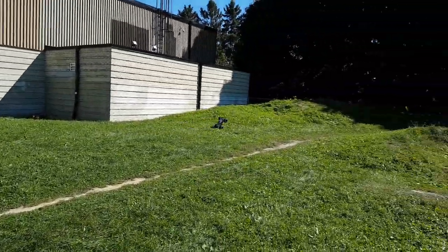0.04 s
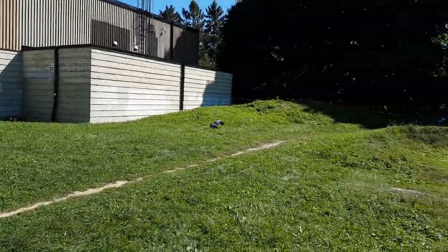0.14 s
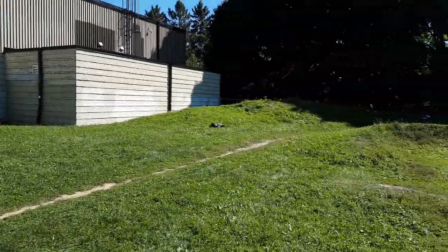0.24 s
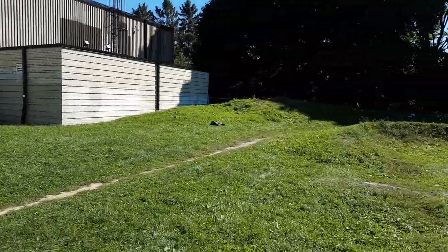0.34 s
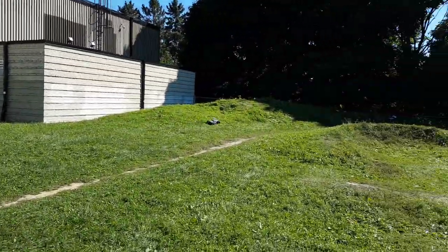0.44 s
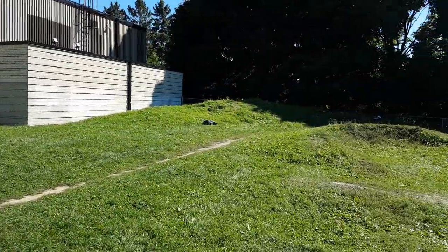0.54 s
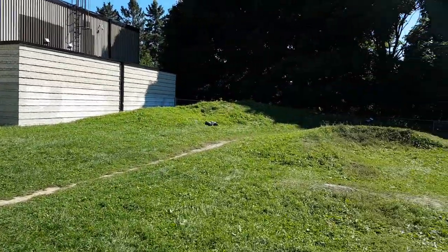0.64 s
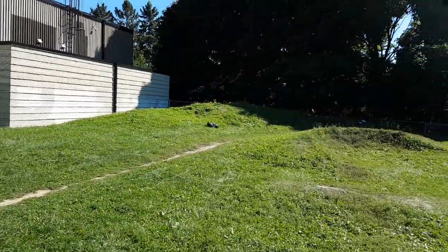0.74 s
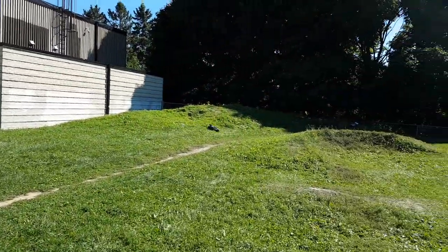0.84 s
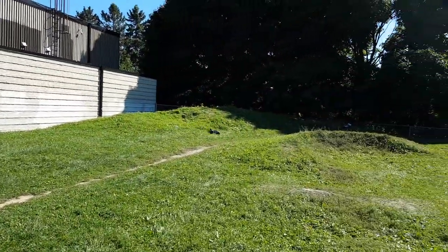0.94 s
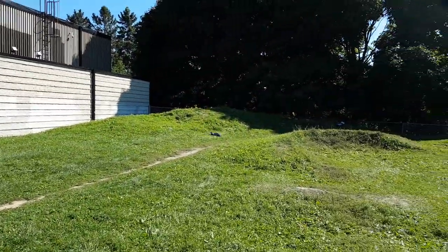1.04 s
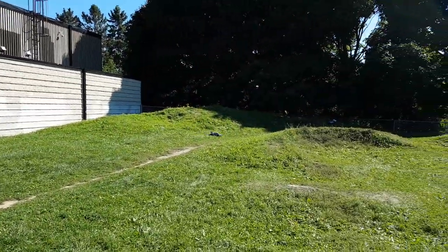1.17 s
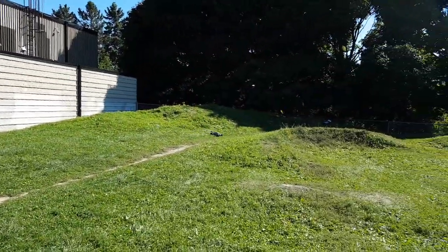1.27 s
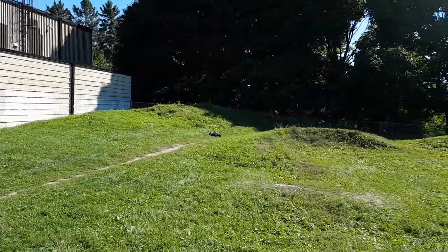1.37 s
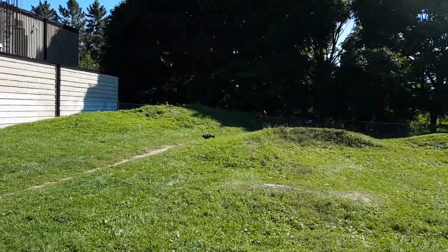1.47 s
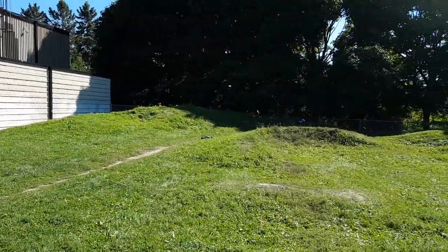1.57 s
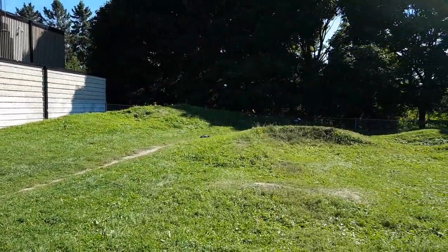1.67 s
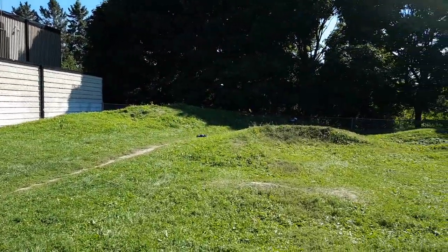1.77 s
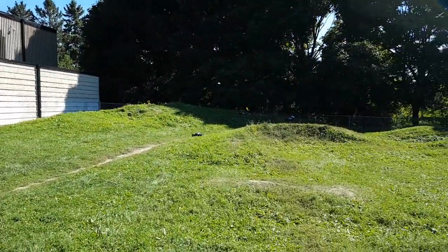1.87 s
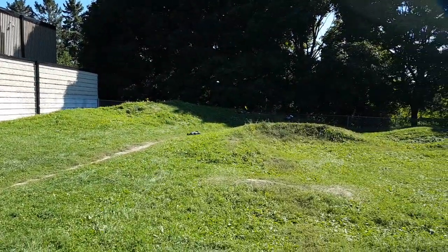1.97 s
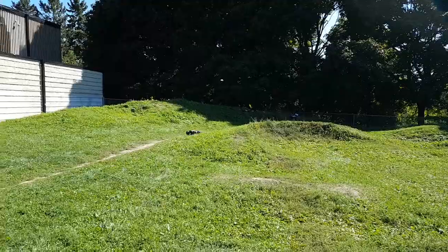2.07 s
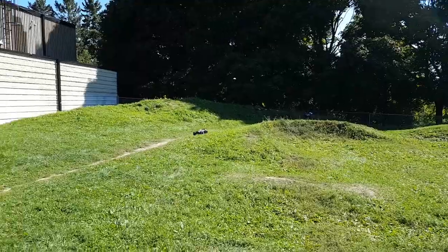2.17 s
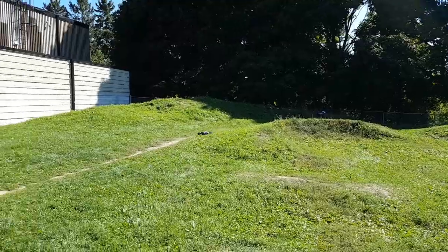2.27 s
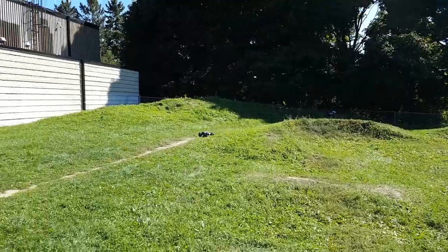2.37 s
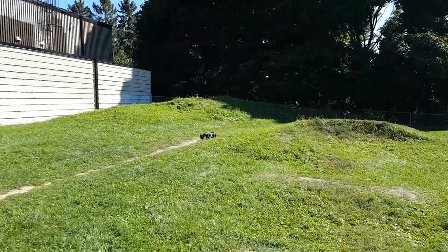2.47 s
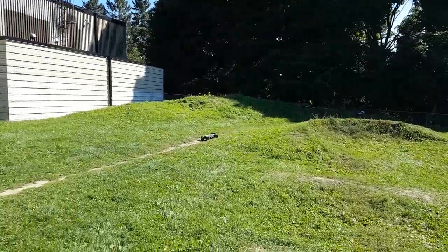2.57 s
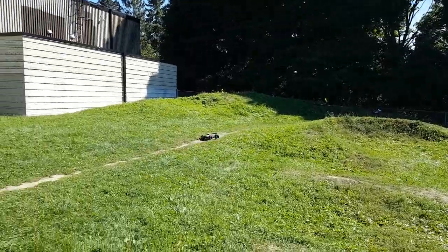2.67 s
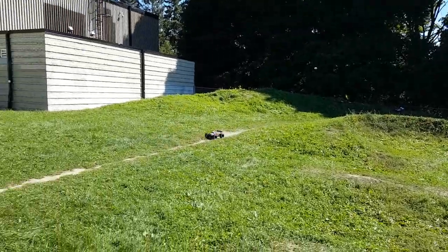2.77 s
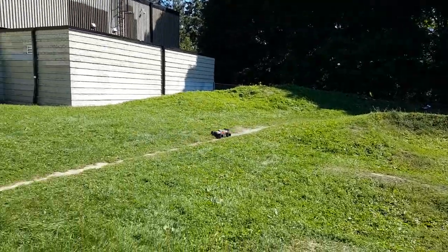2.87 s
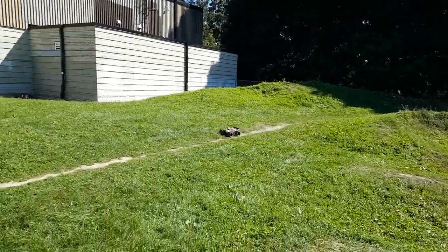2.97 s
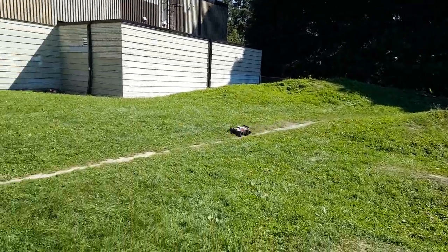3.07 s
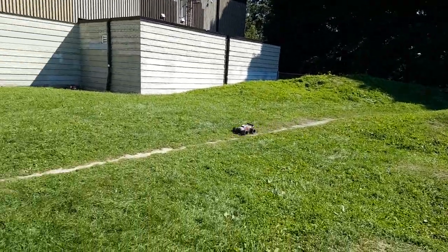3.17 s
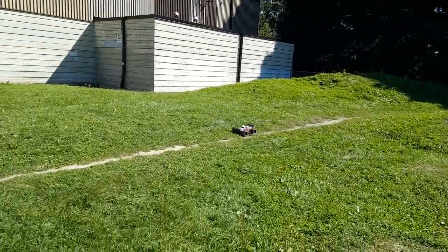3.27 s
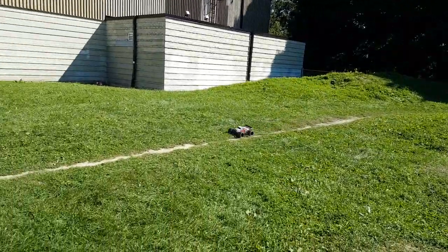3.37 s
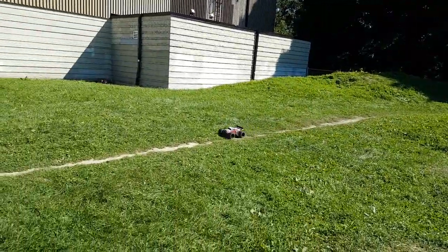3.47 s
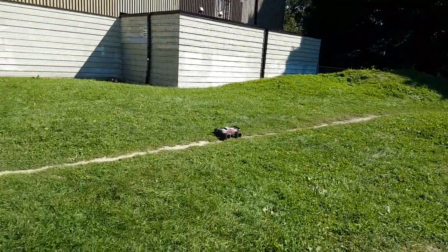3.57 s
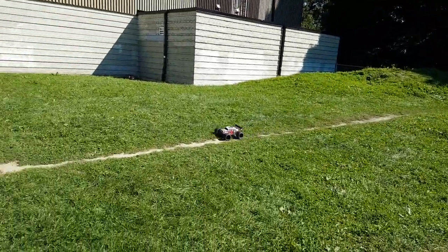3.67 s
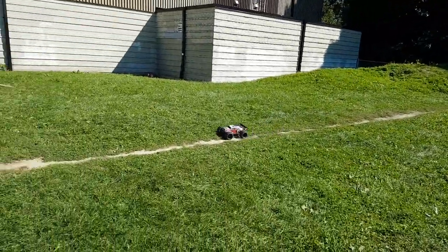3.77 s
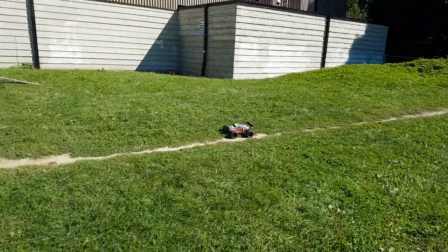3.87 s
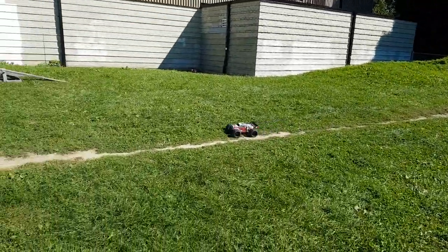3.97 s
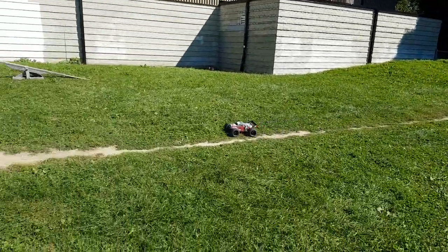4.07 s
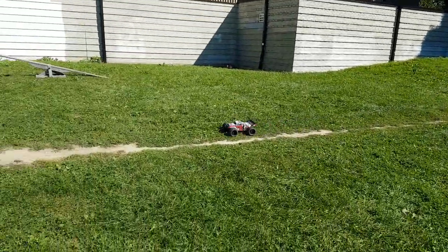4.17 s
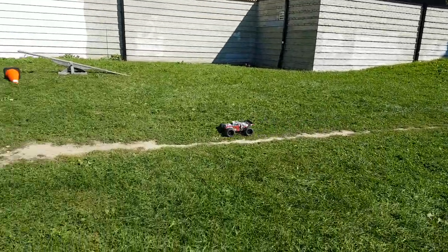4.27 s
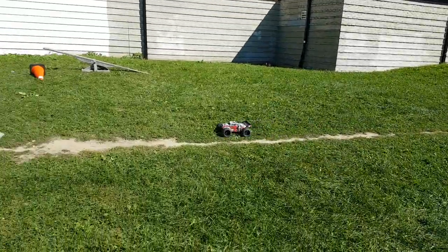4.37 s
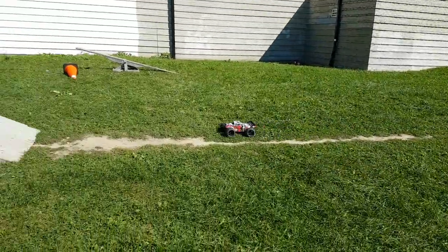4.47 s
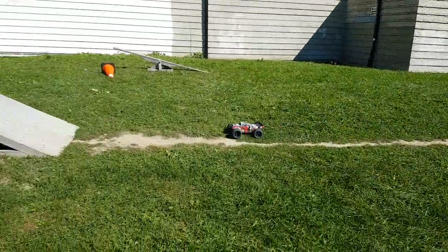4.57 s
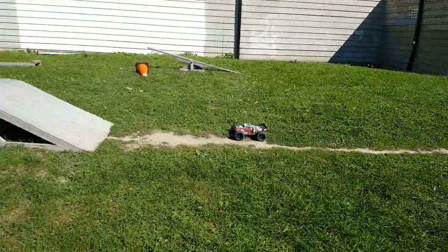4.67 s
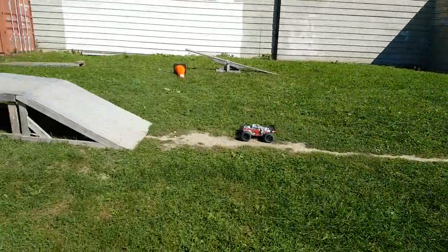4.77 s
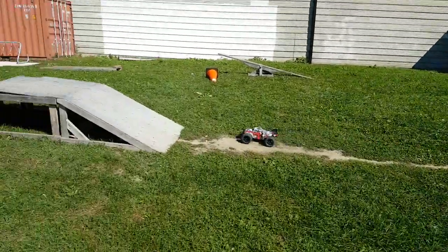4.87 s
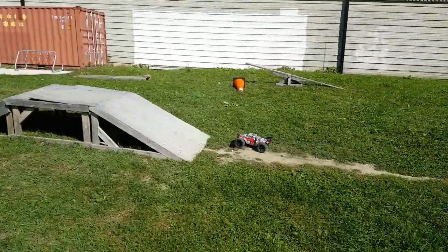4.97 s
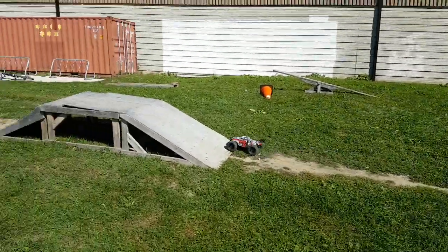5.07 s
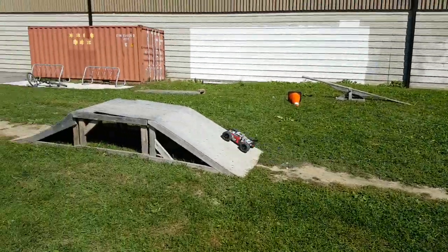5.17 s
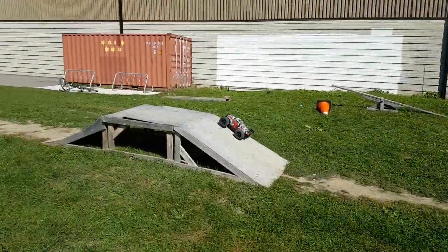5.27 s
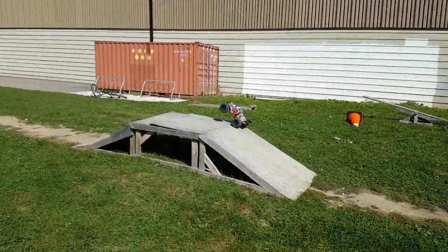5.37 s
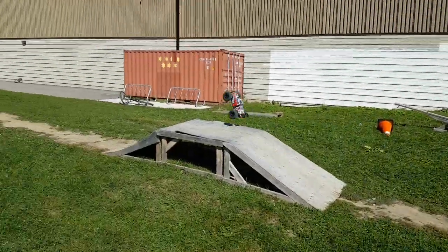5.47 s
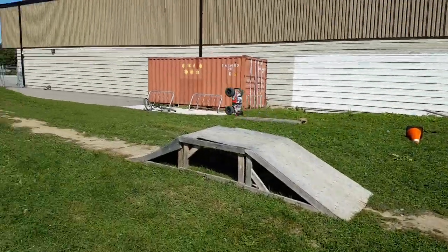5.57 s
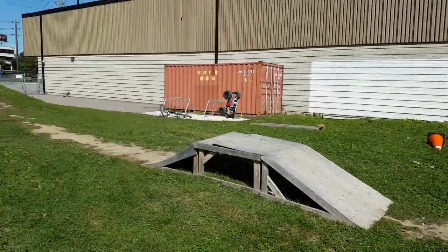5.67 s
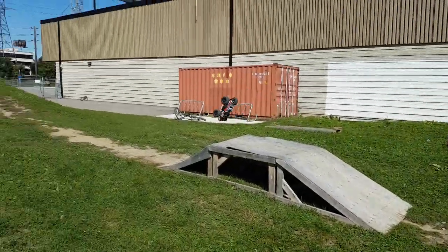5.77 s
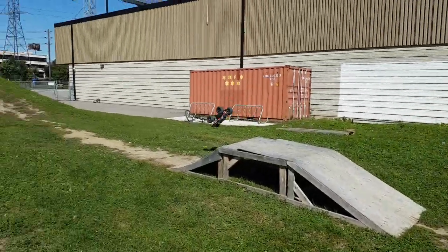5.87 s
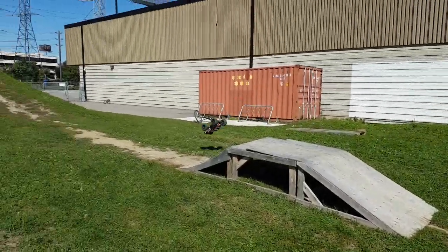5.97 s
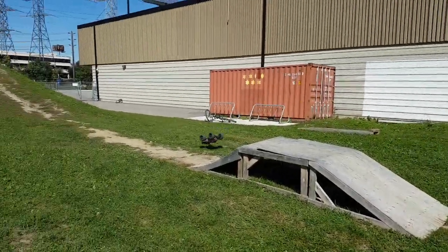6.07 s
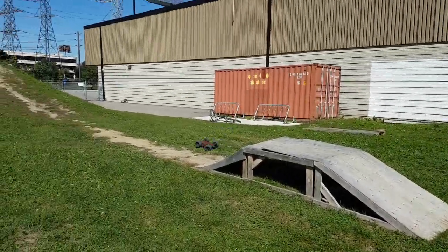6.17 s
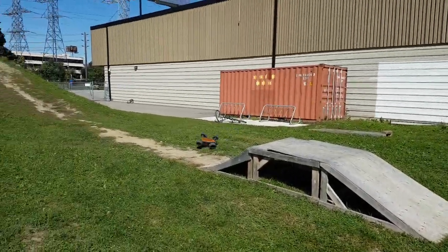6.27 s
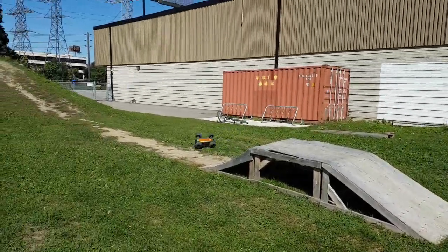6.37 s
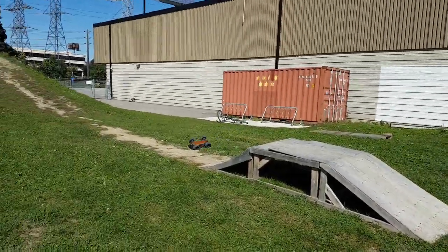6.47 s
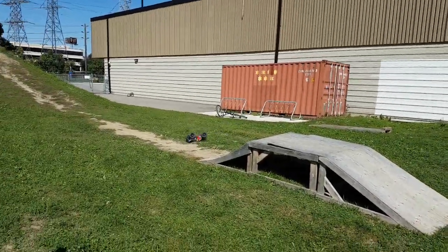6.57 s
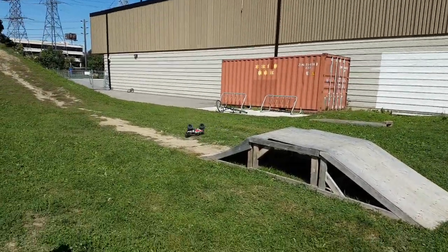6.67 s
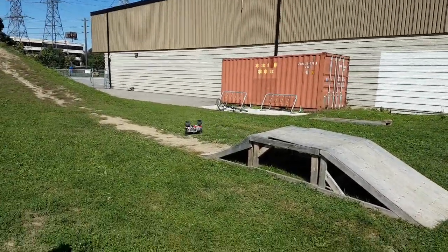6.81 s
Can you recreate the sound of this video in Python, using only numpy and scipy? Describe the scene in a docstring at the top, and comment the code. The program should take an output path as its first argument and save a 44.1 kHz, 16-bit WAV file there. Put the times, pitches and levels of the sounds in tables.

```python
"""Model truck jumping a ramp

Far out on a lawn a battery model truck blips its motor, races up close, bangs over a wooden ramp and
lands. Its gear teeth whine and rattle, its tyres patter through grass, its plastic body clatters, and
a wall echoes faintly. Underneath lie distant traffic, a hum, a few faint chirps and a light breeze.
The camera that holds the two microphones ticks once, and its left channel pops once."""
import sys
import numpy as np
from scipy import signal
from scipy.fft import rfft, irfft
from scipy.io import wavfile
from scipy.ndimage import map_coordinates

SR = 44100
rng = np.random.default_rng(int(sys.argv[2]) if len(sys.argv) > 2 else 0)


def persist_wave(psi):
    """Save psi, clipped to +-1, as 16-bit WAV."""
    counts = np.round(np.clip(psi, -1, 1) * 32767).astype(np.int16)
    wavfile.write(sys.argv[1], SR, np.atleast_2d(counts).T)


N = 301644
TIME = np.arange(N) / SR
FREQS = np.maximum(np.fft.rfftfreq(N, 1 / SR), 1)
TOP_HZ = 15800  # the highest pitch kept

# the bright tone of the truck's thin plastic shell: (frequency [Hz], level [dB])
SHELL_TONE = [(1500, -13), (2900, 5.5), (3600, 3), (4500, 1.5), (5300, -0.5), (6000, -6.5), (7300, -9.5),
              (8400, -21), (9600, -20.5), (12000, -14.5), (15500, -24)]
# pitches that the gear housing boosts or swallows: (frequency [Hz], width [Hz], boost [dB])
HOUSING_RESONANCES = [(1385, 64, 3.5), (1476, 60, -7.5), (1679, 150, 12.5), (2363, 270, 6.5), (2556, 54, 4),
                      (2810, 210, -3), (3450, 150, 6.5), (4600, 150, 0.5), (6100, 113, 9.5),
                      (6440, 120, 4.5)]


def undb(db):
    """Turn decibels into a factor to multiply by."""
    return np.exp(np.asarray(db) * (np.log(10) / 20))


def unit(x):
    """Scale a signal to an average (rms) size of 1."""
    return x / np.sqrt(np.mean(x ** 2))


def over_time(table):
    """Join rows of (time, values...) into one curve for each value column."""
    times, *columns = np.transpose(table)
    return [np.interp(TIME, times, column) for column in columns]


def over_hz(points):
    """Join (frequency, value) points into a curve, giving every octave equal room."""
    hz, value = np.transpose(points)
    return np.interp(np.log(FREQS), np.log(hz), value)


def boosts(resonances):
    """The decibels that a set of resonances adds at each frequency."""
    return sum(db / (1 + (2 * (FREQS - hz) / width) ** 2) for hz, width, db in resonances)


def colour(x, db):
    """Filter x by the given decibels at each frequency."""
    cepstrum = irfft(np.log(undb(db)), N)
    cepstrum[1:N // 2] *= 2  # folded so that ringing comes after a hit, not before
    cepstrum[N // 2 + 1:] = 0
    return irfft(rfft(x) * np.exp(rfft(cepstrum)), N)


def wobble(rate):
    """A smooth random curve of size 1 that changes about rate times a second."""
    knots = rng.standard_normal(8192)
    coarse_times = np.linspace(0, N / SR, N // 16)
    smooth = map_coordinates(knots, [2 * rate * coarse_times], order=3, mode="wrap")
    return unit(np.interp(TIME, coarse_times, smooth))


def noise(tone_db):
    """Two unrelated streams of smooth noise with the given tone."""
    return unit(colour(rng.standard_normal((2, N)), tone_db))


def impacts(rate, spread_db):
    """Two unrelated streams of tiny hits of uneven size, about rate a second in each."""
    out = np.zeros((2, N))
    hits = rng.random(out.shape) < rate / SR
    sizes = rng.exponential(size=out.shape)[hits]
    pushes = rng.standard_normal(out.shape)[hits]
    out[hits] = pushes * undb(spread_db * np.minimum(sizes, 4))
    return unit(out)


def patter(tone_db, rate, spread_db):
    """Many tiny hits on something with the given tone."""
    return unit(colour(impacts(rate, spread_db), tone_db))


def envelope(start, length, attack, t60):
    """Rise, hold until length is up, then fade; t60 is the seconds it takes to fall by 60 dB."""
    rise = np.clip((TIME - start) / attack, 0, 1)
    return rise * np.exp(-np.log(1000) * np.clip((TIME - start - length) / t60, 0, 3))


def ring(start, db, hz, t60):
    """A struck object rings at one pitch and dies away."""
    out = np.zeros(N)
    span = slice(int(start * SR) + 1, int((start + 2 * t60) * SR))
    age = TIME[span] - start
    out[span] = undb(db) * np.sin(2 * np.pi * hz * age) * np.exp(-np.log(1000) * age / t60)
    return out


def microphones(pair, diffuse):
    """Mix two unrelated signals into left and right; a larger diffuse makes the sides less alike."""
    # how alike the two sides are: (frequency [Hz], likeness [0 to 1])
    likeness = [(100, 1), (300, 0.99), (700, 0.98), (1400, 0.82), (3000, 0.69), (7000, 0.2), (15000, 0.16)]
    # the camera body shades one side: (frequency [Hz], left minus right [dB])
    shading = [(100, 0), (700, -.7), (1300, -2), (2400, -6), (3600, -2.5), (4500, -3.5), (5300, 3),
               (6300, 6), (7300, 0), (15000, 1)]
    # sound bends round the camera and reaches the right side late: (frequency [Hz], delay [ms])
    right_lag = [(150, 0.048), (600, 0.044), (1700, 0.051), (3200, .12), (4500, 0.18), (6000, 0.311),
                 (15000, 0.303)]
    alike = np.clip(over_hz(likeness), 0, 1) ** diffuse
    mid, side = rfft(pair) * np.sqrt([1 + alike, 1 - alike]) / np.sqrt(2)
    shade = undb(over_hz(shading) / 2)
    delay = np.exp(-2j * np.pi * FREQS * over_hz(right_lag) / 1000)
    return irfft([(mid + side) * shade, (mid - side) / shade * delay], N)


def yard_echo(x, t60=0.77, tail_db=-11, wall_s=.075, wall_db=-15):
    """The wall throws back one echo; trees and buildings scatter a short tail."""
    fade = np.exp(-np.log(1000) * np.minimum(TIME / t60, 4))
    tail = rng.standard_normal((2, N)) * fade * np.minimum(TIME / 0.0065, 1)
    tail *= undb(tail_db) / np.sqrt(np.sum(tail ** 2) / 2)
    wall = undb(wall_db) * np.exp(-2j * np.pi * FREQS * wall_s)
    return irfft(rfft(x) * (rfft(tail) + wall * np.array([[1], [0]])), N)


def nearness():
    """One over the truck's distance: twice as far away, its sound is half as strong."""
    # the truck's path: (time [s], distance from the microphones [m])
    path = [(0, 16.5), (1.3, 17.1), (2.4, 14.2), (3.6, 9.7), (4.4, 8.2), (5.1, 3.04), (6.2, 7.1),
            (6.84, 17)]
    return 1 / np.maximum(over_time(path)[0], 1)


def town(traffic_db=-55, hum_hz=308, hum_db=-55):
    """Distant traffic murmurs from all sides, with a wavering machine hum."""
    # the tone of far-off traffic: (frequency [Hz], level [dB])
    traffic_tone = [(25, -25), (45, -10), (120, -8), (200, -32), (320, -3), (460, -14), (700, -9),
                    (1400, -14.5), (2400, -16), (3100, -22), (4600, -29.5), (6300, -34.5), (8400, -43),
                    (15500, -35.5)]
    traffic = noise(over_hz(traffic_tone)) * undb(traffic_db + 1.8 * wobble(2.273))
    hum = np.sin(2 * np.pi * hum_hz * TIME + 0.69 * wobble(10)) * undb(hum_db + 2 * wobble(6))
    return microphones(traffic, diffuse=57.0) + hum


def chirps(waver=.04, direct_db=-8, scatter_db=4):
    """Short, unsteady chirps, perhaps from a bird, are blurred by the trees."""
    # faint high calls: (time [s], level [dB], length [s], start pitch [Hz], end pitch [Hz])
    calls = [(2.942, -51.5, 0.055, 5220, 5650), (3.106, -52, 0.033, 6050, 5980),
             (3.679, -42.5, 0.032, 4550, 4910), (3.71, -48, .03, 5200, 4850),
             (3.823, -54, 0.042, 5850, 5600)]
    out = np.zeros(N)
    for start, db, length, start_hz, end_hz in calls:
        progress = np.clip((TIME - start) / length, 0, 1)
        hz = (start_hz + (end_hz - start_hz) * progress) * (1 + waver * wobble(190))
        out += undb(db) * np.sin(np.pi * progress) * np.sin(2 * np.pi * np.cumsum(hz) / SR)
    return undb(direct_db) * out + undb(scatter_db) * yard_echo(out, t60=0.27, wall_db=-28)


def breeze(start_s=5.3, length_s=1.37, rumble_db=-51, corner_hz=130):
    """A light breeze makes a low rumble on the microphones."""
    tone_db = -10 * np.log10((1 + (FREQS / corner_hz) ** 8) * (1 + (corner_hz / 2 / FREQS) ** 2))
    rumble = noise(np.maximum(tone_db, -80))
    return rumble * undb(rumble_db) * envelope(start_s, length_s, attack=0.13, t60=.6)


def camera(tick_s=.5622, pop_s=1.83287, step_db=1.0, drain_hz=98):
    """The camera's case ticks; a jump in voltage pops in the left channel and drains away."""
    # the ringing of the case: (pitch [Hz], level [dB], fade time [s])
    case_rings = [(1760, -17, .012), (2150, -23, .007), (2900, -29, .005)]
    tick = sum(ring(tick_s, db, hz, t60) for hz, db, t60 in case_rings)
    tick = signal.sosfilt(signal.butter(4, [1580, 3200], "band", fs=SR, output="sos"), tick)
    step = undb(step_db) * np.clip((TIME - pop_s) / .00006 + .5, 0, 1)
    pop = signal.sosfilt(signal.butter(2, drain_hz, "high", fs=SR, output="sos"), step)
    pop = colour(pop, boosts([(9000, 3500, -7)]))  # a wide dip softens the treble
    return np.array([tick / 2 + pop, tick])


def controller_sizzle(switch_hz=12000, flutter_rate=230):
    """At part throttle the speed controller chops the current, and the motor's coils sing thinly."""
    # moments of sizzle: (time [s], length [s], level [dB])
    sizzles = [(1.5, .04, -68), (1.88, 0.092, -72), (2.12, 0.034, -63), (2.331, .05, -58), (2.42, .22, -77)]
    gain = sum(undb(db) * envelope(start, length, attack=.02, t60=.1) for start, length, db in sizzles)
    tone = np.sin(2 * np.pi * switch_hz * TIME)
    return gain * tone * np.array([wobble(flutter_rate), wobble(flutter_rate)])


def grit(crack_t60=0.0081):
    """Stones and crumbs of earth hit the shell with a crack and make it ring briefly."""
    # each hit: (time [s], level [dB], pitch [Hz], fade time [s], crack compared with ring [dB])
    stones = [(.218, -27.5, 1200, 0.0066, -16), (.236, -37, 1350, 0.0072, -13),
              (1.183, -42, 2650, .015, -13), (1.477, -37, 4360, .012, -13), (1.643, -33, 740, 0.026, -31),
              (1.675, -31, 790, 0.013, -22), (1.87, -42, 3700, 0.013, -1), (1.884, -40, 4650, .014, 0),
              (1.903, -34, 3670, 0.013, -4), (1.982, -28.5, 3535, 0.018, -16),
              (1.992, -35, 905, 0.012, -15), (2.104, -35, 3570, 0.018, -9),
              (2.193, -24.5, 3600, 0.016, -12), (2.292, -40, 3530, .019, -11),
              (3.962, -39, 1705, 0.064, -14)]
    rings = sum(ring(start, db, hz, t60) for start, db, hz, t60, _ in stones)
    cracks = sum(undb(db + crack_db) * envelope(start, 0, 1 / SR, crack_t60)
                 for start, db, _, _, crack_db in stones)
    return rings + cracks * noise(over_hz(SHELL_TONE))


def tyres(soil_db=-34.5, tread_db=-30.5, bump_db=1.5, takeoff_s=5.48, landing_s=6.21, flight_db=-4):
    """Wheels thud on the soil and their knobs patter on the grass, louder on rough patches."""
    # the dull thud of soil: (frequency [Hz], level [dB])
    soil_tone = [(25, -21), (55, -5.5), (110, 1), (200, 1.5), (250, -3), (350, -17.5), (800, -51)]
    # tyre knobs on grass: (frequency [Hz], level [dB])
    grass_tone = [(100, -21.5), (220, -2), (280, 0), (390, 2.5), (500, -5), (720, 1), (1100, -7.5),
                  (1600, -23.5), (4000, -44.5)]
    # rough patches of lawn: (time [s], length [s], thud [dB], patter [dB])
    patches = [(-.05, 0.12, -44.5, -50.5), (0.262, 0.15, -45.5, -50.5), (1.447, 0.26, -50, -52),
               (1.877, 0.53, -50.5, -57.5), (2.361, 0.59, -69, -48), (3.724, 0.32, -44, -52),
               (4.303, 0.612, -44.5, -69), (4.928, 0.25, -42.5, -41), (6.556, 0.21, -48.5, -58)]
    in_air = (TIME > takeoff_s) & (TIME < landing_s)
    rolling = nearness() * undb(flight_db * in_air)
    power = np.outer(undb([soil_db, tread_db]), rolling) ** 2
    for start, length, *levels_db in patches:
        power += np.outer(undb(levels_db), envelope(start, length, attack=0.023, t60=0.77)) ** 2
    soil_gain, tread_gain = np.sqrt(power)
    soil = patter(over_hz(soil_tone), rate=3000, spread_db=0.57) * soil_gain
    grass = patter(over_hz(grass_tone), rate=3000, spread_db=1.1) * tread_gain
    return (soil + grass) * undb(bump_db * wobble(24))


def ramp():
    """The tyres drum on the hollow wooden ramp while they cross it."""
    # how loud the drumming is: (time [s], level [dB])
    crossing = [(5.15, -43), (5.17, -20), (5.21, -25), (5.25, -33), (5.29, -26.5), (5.37, -27.5),
                (5.445, -23.5), (5.465, -32), (5.495, -44)]
    # the tone of the boards: (frequency [Hz], level [dB])
    board_tone = [(25, -39), (60, -37), (120, -12), (280, -6.5), (450, -6.5), (700, -2), (1030, -8.5),
                  (1400, -14), (2600, -21), (4000, -53), (9000, -68)]
    # pitches that the ramp boosts or swallows: (frequency [Hz], width [Hz], boost [dB])
    board_resonances = [(105.5, 24, 7.6), (239.2, 30, 8), (325.6, 32.6, 8), (680, 70, 4), (810, 20.8, -5),
                        (997, 63, 7.5)]
    drumming = patter(over_hz(board_tone) + boosts(board_resonances), rate=3000, spread_db=0.33)
    on_ramp = (TIME > crossing[0][0]) & (TIME < crossing[-1][0])
    return drumming * undb(over_time(crossing)[0]) * on_ramp


def body_knocks(contact_size=4.6, samples=16384):
    """Each knock is one hard contact amid loose parts clattering against the ringing shell."""
    # knocks: (time [s], level [dB], rise time [s], fade time [s], treble tilt [dB per octave])
    knocks = [(.069, -39, .006, 0.15, -7), (0.329, -35, 0.0033, 0.1, -2.5), (.39, -37, 0.0051, 0.086, -4),
              (1.641, -42, 0.0019, 0.066, -0.5), (1.671, -43, 0.0016, .08, -3),
              (1.69, -40, 0.0055, 0.048, -7), (2.083, -37, 0.0034, 0.057, -9.5),
              (2.632, -35, 0.021, 0.15, 1), (2.77, -44, 0.0091, 0.34, -9), (3.96, -41, .003, 0.11, 4),
              (3.995, -40.5, 0.0048, .076, 4), (5.162, -19, .003, 0.091, 0),
              (5.212, -21.5, 0.0065, 0.082, -5.5), (5.224, -17, 0.0029, 0.094, -1.5),
              (5.237, -17.5, 0.0029, 0.061, -5.5), (5.25, -13.5, 0.004, 0.09, -26),
              (6.207, -19, .009, 0.084, 3), (6.2194, -17, 0.004, 0.097, 0.5), (6.249, -27, .004, 0.086, -2),
              (6.261, -20.5, 0.0022, 0.036, 1.5), (6.273, -31, .004, .13, 3),
              (6.305, -32, 0.009, 0.1, -1.5), (6.557, -25, 0.015, 0.13, -1),
              (6.689, -36.5, 0.0099, 0.054, -9.5)]
    # the tone of the plastic body: (frequency [Hz], level [dB])
    body_tone = [(25, -48), (50, -25), (105, -0.5), (180, -0.5), (260, 7), (450, -5), (760, 1.5),
                 (1150, -11), (1400, -13), (2400, -11.5), (3150, -25.5), (3750, -17), (7200, -33),
                 (9000, -52), (12100, -43), (15500, -57)]
    # pitches that the struck shell boosts or swallows: (frequency [Hz], width [Hz], boost [dB])
    shell_resonances = [(251.1, 60, -6), (573, 29.5, 6.5), (760, 91, 0.5), (1000, 180, 5), (1349, 43, 12),
                        (1695, 170, 12.5), (1990, 60, -0.5), (2447, 80, 7), (2640, 230, 5.5),
                        (3593, 126, 9.5), (4067, 55, -4)]
    ticks = impacts(rate=4000, spread_db=1.65)
    contacts = [int((start + rise) * SR) for start, _, rise, _, _ in knocks]
    ticks[0, contacts] += contact_size
    clatter = colour(ticks, over_hz(body_tone) + boosts(shell_resonances))
    octaves = np.log2(np.clip(np.fft.rfftfreq(samples, 1 / SR), 220, 6000) / 700)
    out = np.zeros((2, N))
    for start, db, rise, t60, tilt_db in knocks:
        span = slice(int(start * SR), int(start * SR) + samples)
        age = np.maximum(TIME[span] - start, 0)
        shape = np.minimum(age / rise, 1) * np.exp(-np.log(1000) * np.maximum(age - rise, 0) / t60)
        tilted = irfft(rfft(clatter[:, span], samples) * undb(tilt_db * octaves))
        knock = tilted[:, :len(age)] * shape
        even_out = np.sqrt(np.sum(shape ** 2) / np.sum(knock ** 2, axis=1, keepdims=True))
        out[:, span] += knock * even_out * undb(db)
    return out


def gear_rattle(whine_gain, overtone_db, box_db=-36.5, shell_db=-39.5, rasp_db=-14, flutter_db=1.16,
                drone_hz=1790, drone_width_hz=300, fade_db_per_s=8.5):
    """Loose teeth and drive shafts tick against the gearbox and shell; hard-working teeth also rasp."""
    # spells when the gears run slack: (time [s], length [s], gearbox [dB], shell [dB], drone [dB])
    slack_spells = [(-.05, 0.46, -51.5, -50.5, -73), (0.515, 0.2, -51.5, -55.5, -56),
                    (0.91, .12, -70, -56, -75), (1.16, 0.32, -55, -64.5, -74),
                    (1.438, 0.11, -55, -50.5, -73), (2.372, 0.1, -47, -45, -62),
                    (2.49, .18, -50, -51.5, -66), (4.006, 0.28, -50, -60, -66),
                    (4.32, 0.25, -42.5, -55.5, -40), (4.596, 0.381, -45, -58, -49),
                    (4.93, 0.18, -41, -55, -50), (5.156, 0.6, -36.5, -42.5, -67),
                    (5.794, 0.77, -49, -49.5, -72)]
    # the tone of the gearbox: (frequency [Hz], level [dB])
    gearbox_tone = [(500, -38), (1000, -3), (1400, 3), (1750, -3), (2300, 2), (2600, 3), (2950, -4),
                    (4000, -36), (8000, -40)]
    # the shell's ringing as the gears shake it: (frequency [Hz], width [Hz], boost [dB])
    shell_rings = [(2960, 310, -5), (3528, 153, 9), (4020, 180, -1.5), (4280, 150, 7), (4626, 86, 10),
                   (5510, 140, 3), (5970, 140, 8), (6550, 140, 6.5), (7930, 260, 4.5)]
    power = np.outer([undb(box_db), undb(shell_db), 0], nearness()) ** 2  # steady rolling
    for start, length, *levels_db in slack_spells:
        fade = undb(-fade_db_per_s * np.maximum(TIME - start, 0))
        slack = envelope(start, length, attack=0.051, t60=0.79) * fade
        power += np.outer(undb(levels_db), slack) ** 2
    box_gain, shell_gain, drone_gain = np.sqrt(power)
    shell_gain += whine_gain * undb(overtone_db + rasp_db)
    box = patter(over_hz(gearbox_tone) + 0.75 * boosts(HOUSING_RESONANCES), rate=6000, spread_db=0.99)
    shell = patter(over_hz(SHELL_TONE) + boosts(shell_rings), rate=7000, spread_db=0.47)
    drone_tone = -20 * np.log10(1 + (2 * (FREQS - drone_hz) / drone_width_hz) ** 2)
    drone = patter(drone_tone, rate=5000, spread_db=1.0)  # the housing rings round one pitch
    return (box * box_gain + shell * shell_gain + drone * drone_gain) * undb(flutter_db * wobble(21.3))


def throttle(db_per_octave=15, attack_share=.3):
    """Pitch, strength and overtone level of the whine; within a blip, faster means louder."""
    # the long run; wheels bite at the ramp's foot and spin free off its top: (time [s], pitch [Hz])
    run_pitch = [(4.0, 1375), (4.15, 1370), (4.24, 1440), (4.29, 1420), (4.37, 1480), (4.5, 1495),
                 (4.72, 1560), (4.86, 1605), (4.9, 1705), (4.96, 1950), (5.04, 1960), (5.08, 2240),
                 (5.11, 2380), (5.155, 3100), (5.2, 2650), (5.225, 2430), (5.237, 2000), (5.27, 2200),
                 (5.29, 3020), (5.345, 3080), (5.38, 3560), (5.435, 3730), (5.47, 3820)]
    # how hard the gears work on that run: (time [s], level [dB], overtone boost [dB])
    run_load = [(3.99, -53, -10), (4.04, -40.5, -12.5), (4.3, -39, -11.5), (4.6, -35, -11),
                (4.83, -36, -8.5), (4.89, -28, -12.5), (4.96, -27.5, -15.5), (5.04, -27, -14),
                (5.08, -26, -25), (5.12, -39, -12), (5.155, -31.5, -14), (5.204, -36, -14),
                (5.238, -15, -23.5), (5.265, -21.5, -15), (5.28, -30.5, -18), (5.32, -27.5, -21),
                (5.37, -31, -5), (5.425, -31.5, 0), (5.46, -38.5, 6)]
    # motor blips: (time [s], length [s], start pitch [Hz], end pitch [Hz], level [dB],
    # overtone boost [dB])
    blips = [(0, 0.069, 2284, 2205, -50.5, -12), (0.478, 0.31, 1820, 1806, -45.5, -25),
             (0.762, .12, 1780, 1766, -53, -30), (0.919, 0.054, 1500, 1563, -57, -3),
             (0.99, 0.077, 1652, 1760, -51.5, -3.5), (1.179, .22, 2138, 2194, -54, -42),
             (1.433, 0.061, 1625, 2116, -42, -8), (1.526, 0.065, 2064, 1970, -54, -7),
             (1.856, 0.13, 2075, 1994, -49, -3), (2.068, .035, 1566, 1785, -49, -1),
             (2.106, 0.041, 2000, 2330, -41, -0.5), (2.174, 0.046, 2100, 2298, -45, -5),
             (2.253, 0.031, 2160, 2287, -51, 4), (2.296, 0.032, 2180, 2154, -46, -0.5),
             (2.327, 0.058, 2325, 2385, -42.5, -1.5), (2.375, 0.035, 2453, 3093, -45, -2),
             (2.412, 0.065, 3497, 3617, -36.5, -20), (2.502, 0.2, 1666, 1664, -48, -22),
             (2.699, .1, 1670, 1668, -55, -12), (5.45, 0.048, 4485, 5000, -38.5, -7),
             (5.47, .35, 2273, 2204, -44, -17), (6.302, .13, 2365, 2420, -50, -8)]
    hz, db, overtone_db = over_time(run_pitch) + over_time(run_load)
    run_start, run_end = run_load[0][0], run_load[-1][0]
    gain = undb(db) * envelope(run_start, run_end - run_start, attack=.018, t60=0.041)
    for start, length, start_hz, end_hz, blip_db, blip_overtone_db in blips:
        blip_hz = np.interp(TIME, [start, start + length], [start_hz, end_hz])
        shape = envelope(start, length, attack=attack_share * length, t60=.14)
        blip_gain = undb(blip_db + db_per_octave * np.log2(blip_hz / end_hz)) * shape
        leads = blip_gain > gain  # one motor: the strongest spell sets its speed
        hz = np.where(leads, blip_hz, hz)
        overtone_db = np.where(leads, blip_overtone_db, overtone_db)
        gain = np.maximum(blip_gain, gain)
    return hz, gain, overtone_db


def gear_whine(hz, gain, overtone_db, teeth=12, throb_depth=.37, slack_rate=230, slip_db=1.75):
    """Meeting teeth whine; an off-centre gear makes the note throb, and slack between teeth blurs it."""
    # the tones that make up the whine: (multiple of the pitch [ratio])
    multiples = [.5, 1, 2, 3, 4, 5]
    # the strength of each of those tones: (level [dB])
    levels_db = [-15.5, -0.5, 2, 0.5, -3.5, 5]
    # how well the housing gives off sound: (frequency [Hz], level [dB])
    housing_tone = [(700, 2.5), (1400, -4), (2300, -1.5), (3100, 0), (3550, -1), (3920, 3.5), (4130, -2),
                    (4380, 0), (5000, -9), (5600, 0.5), (6100, -7), (7100, -15.5), (7700, -18), (8400, -33),
                    (10000, -41), (12000, -27), (15500, -34)]
    metres = 1 / nearness()
    jitter = (0.00607 + .0006 * metres) * wobble(97.3)
    wander = .008 * wobble(18)
    phase = 2 * np.pi * np.cumsum(hz * (1 + jitter + wander)) / SR
    throb = 1 + throb_depth * np.cos(phase / teeth + wobble(23))  # once for each turn of the shaft
    blur = .44 + .008 * metres
    loss_db = 0.13 * metres * (hz / 5000) ** 2  # air and grass dull the treble from far off
    out = np.zeros((2, N))
    for k, db in zip(multiples, levels_db):
        size = undb(db + (overtone_db if k > 1 else 0) - loss_db * k ** 2) * (k * hz < TOP_HZ)
        scatter = blur * k ** .28  # higher tones are less steady
        sine, cosine = np.sin(k * phase), np.cos(k * phase)
        out[0] += size * (1 + scatter * wobble(slack_rate)) * sine
        out[0] += size * scatter * wobble(slack_rate) * cosine
        out[1] += size * 1.75 * scatter * wobble(slack_rate) * cosine  # blur alone, for stereo width
    load = gain * undb(-3.0 + slip_db * wobble(32))  # the wheels grip and slip
    whine = out * throb * load / np.sqrt(.5 + 2 * blur ** 2)
    return colour(whine, over_hz(housing_tone) + 0.72 * boosts(HOUSING_RESONANCES))


def scene():
    """The truck and its echo reach the two microphones over the background."""
    hz, gain, overtone_db = throttle()
    whine, knocks = gear_whine(hz, gain, overtone_db), body_knocks()
    direct = microphones(whine + knocks + grit() + controller_sizzle(), diffuse=1.0)
    rustle = microphones(gear_rattle(gain, overtone_db) + tyres() + ramp() + breeze(), diffuse=1.96)
    echo = microphones(yard_echo(whine[0] + undb(-4.5) * knocks[0]), diffuse=8.3)
    return direct + rustle + echo + chirps() + town() + camera()


def record(dry):
    """The recorder flattens peaks beyond full scale and cuts the highest treble."""
    treble_cut = signal.ellip(8, .1, 60, TOP_HZ, fs=SR, output="sos")
    return signal.sosfiltfilt(treble_cut, np.clip(dry, -1, 1))


dry = scene()
out = record(dry)
persist_wave(out)
```